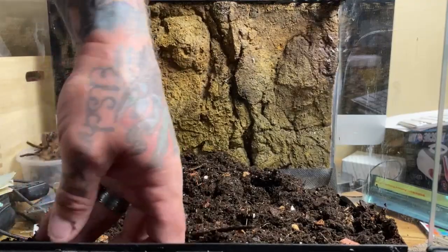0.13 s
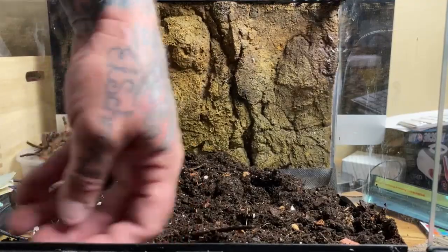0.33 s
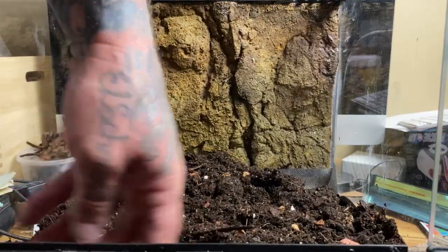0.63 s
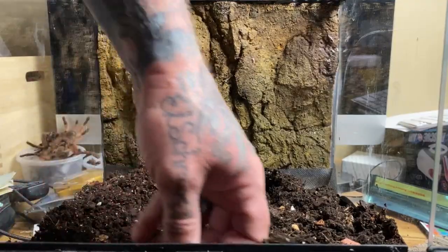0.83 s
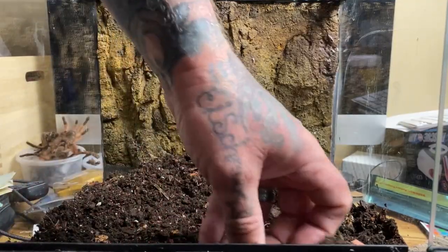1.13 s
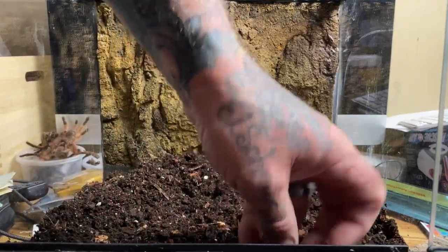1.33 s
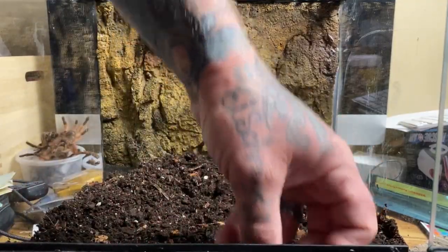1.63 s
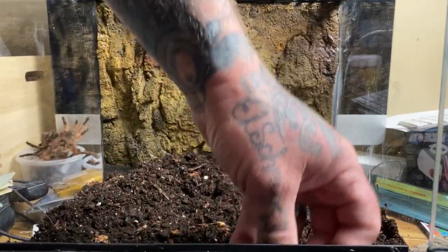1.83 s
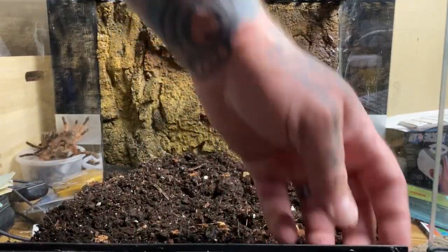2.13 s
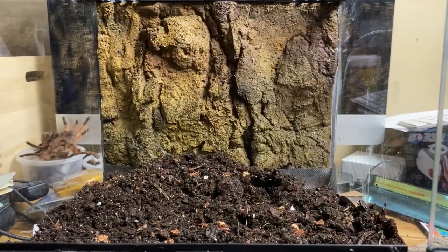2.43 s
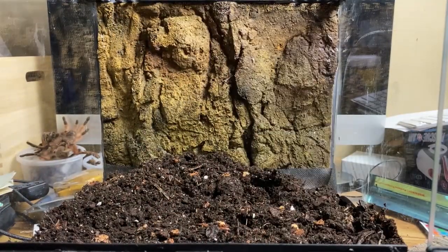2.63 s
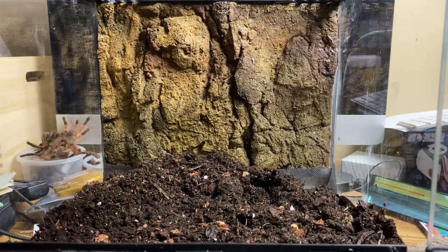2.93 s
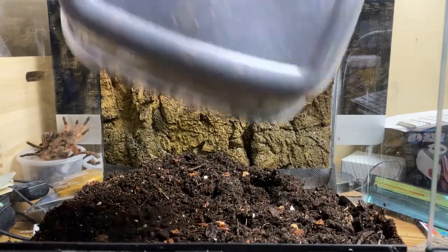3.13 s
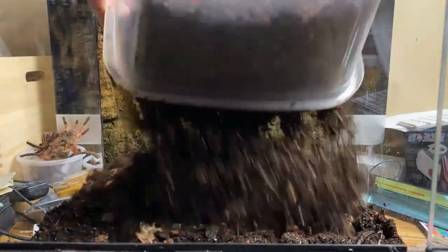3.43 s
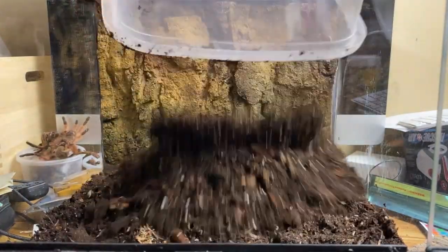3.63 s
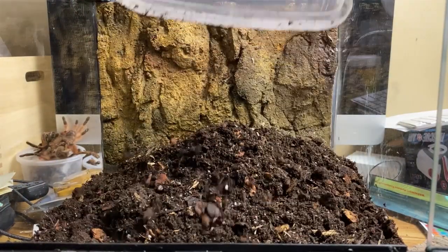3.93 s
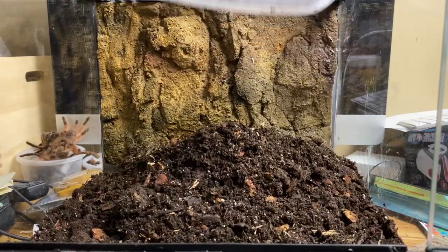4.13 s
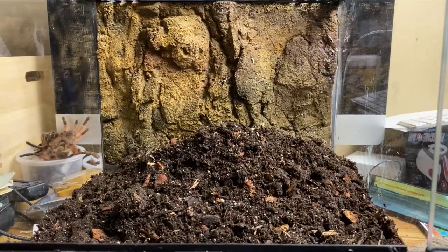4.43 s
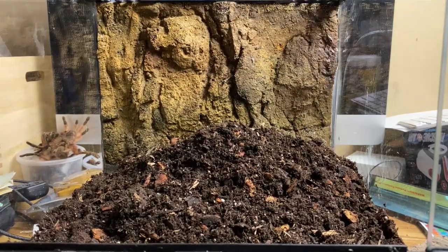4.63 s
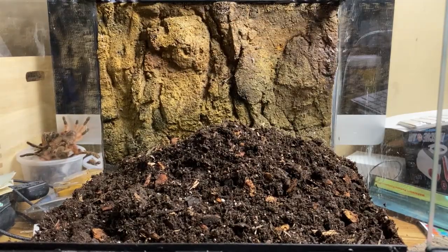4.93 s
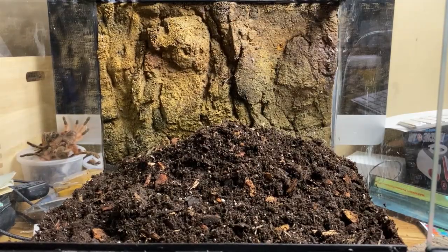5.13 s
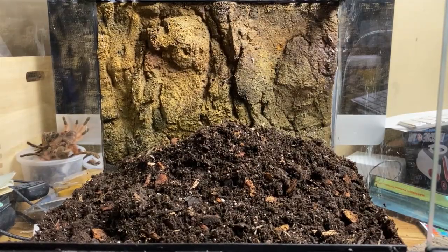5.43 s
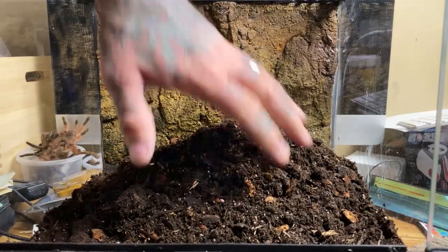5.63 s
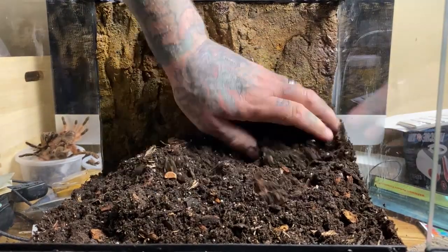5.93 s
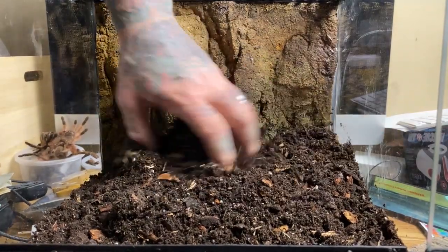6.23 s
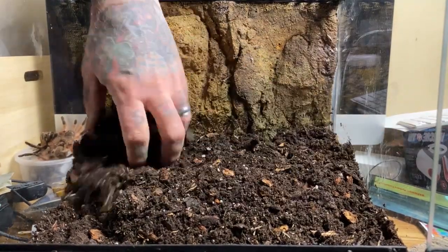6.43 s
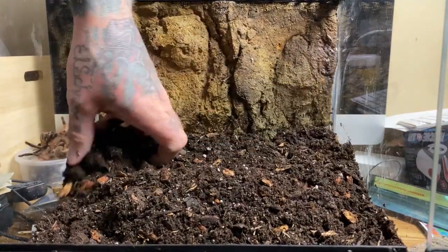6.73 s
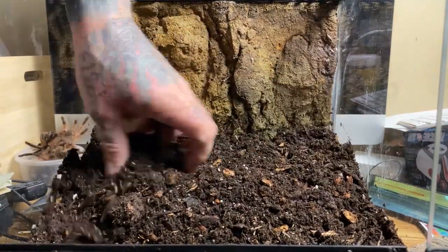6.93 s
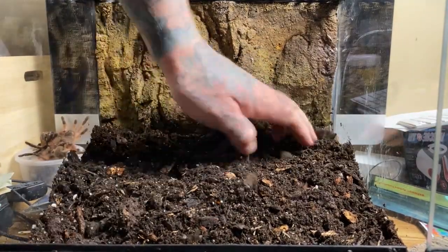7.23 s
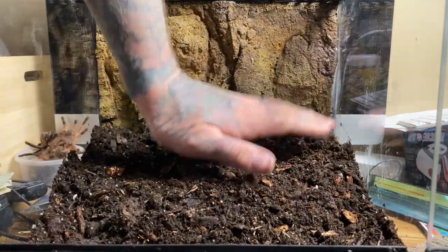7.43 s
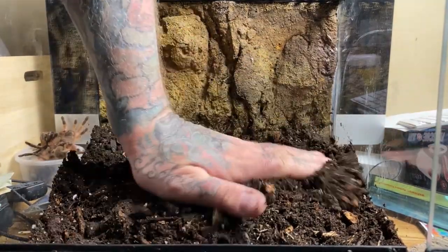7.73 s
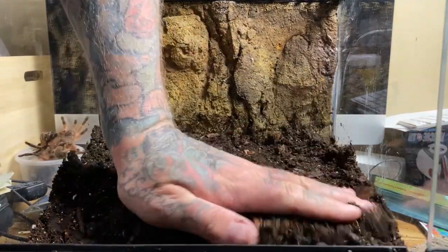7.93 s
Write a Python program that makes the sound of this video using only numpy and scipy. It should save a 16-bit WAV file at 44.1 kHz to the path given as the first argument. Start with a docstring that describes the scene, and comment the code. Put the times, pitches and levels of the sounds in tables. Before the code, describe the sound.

Close stereo pickup in a small furnished room with a faint wavering low hum. Fingers press and spread moist, barky soil in a glass tank with soft crumbles and small crunches. Loose soil shifts in a plastic tub, then pours in a short dense rush with damp thumps. After light sliding bits, the empty tub lands with a loud hollow crack and rattle, and the hand rakes the heap with muffled thuds and rustles.

```python
"""Over a soft, slightly wavering appliance hum, a hand spreads moist soil in a glass tank in a small room:
swells of filtered fracture grains, with crunches, scrapes, snaps and thuds.
Loose soil then slides in a plastic tub and pours out, denser grains with clods as damped bumps.
The empty tub lands hard nearby, a noise crack and decaying modes; it rocks and settles.
The hand then rakes the heap flat, again as grain swells, crunches, snaps and thuds."""
import sys
import numpy as np
from scipy import signal
from scipy.fft import rfft, irfft, next_fast_len
from scipy.io import wavfile

SR = 44100
rng = np.random.default_rng(int(sys.argv[2]) if len(sys.argv) > 2 else 0)


def wrap_up_sound(samples):
    """Save the sound to the file named by the first command line argument, as 16-bit audio."""
    columns = np.atleast_2d(samples).T
    # keep every value between -1 and 1, then stretch to whole-number steps
    tamed = np.clip(columns, -1, 1)
    steps = np.round(tamed * 32767).astype(np.int16)
    wavfile.write(sys.argv[1], SR, steps)


N = 356769
TIME = np.arange(N) / SR
# the pour: [t/s, crumb flow level/dB, landing damp mass level/dB]
POUR = [(3.12, -51.5, -61.5), (3.222, -50.5, -45), (3.354, -38.5, -43.5), (3.386, -38, -34.5),
        (3.44, -46, -44), (3.474, -41, -36.5), (3.519, -44, -42), (3.599, -57.5, -69)]
# stereo spread of the soil: [f/Hz, side over mid/dB]
SOIL_SPREAD = [(120, -18), (350, -12), (1000, -5), (2500, -6.5), (8000, 0.5)]
# stereo balance of the soil: [f/Hz, left over right/dB]
SOIL_BALANCE = [(200, 0), (700, -2), (2400, -1.5), (4400, -3.5), (10000, 0.6)]
SOIL_LAG_S, TUB_LAG_S = 4e-5, 5e-4  # delay of the left port


def undb(db):
    """Decibels to gain."""
    return np.exp(np.asarray(db) * (np.log(10) / 20))


def unit(x):
    """Scale to rms 1."""
    return x / np.sqrt(np.mean(x ** 2))


def colour(x, points):
    """Filter by a gain curve of [f/Hz, gain/dB], straight over log frequency."""
    hz, db = np.transpose(points)
    size = next_fast_len(x.shape[-1], real=True)
    f = np.maximum(np.fft.rfftfreq(size, 1 / SR), 1)
    gain = undb(np.interp(np.log(f), np.log(hz), db))
    return irfft(rfft(x, size) * gain, size)[..., :x.shape[-1]]


def band(x, hz, octaves):
    """Filter by a bell over log frequency, falling a little towards the treble; rms 1."""
    size = next_fast_len(len(x))
    f = np.maximum(np.fft.rfftfreq(size, 1 / SR), 1)
    bell = np.exp(-.5 * (np.log2(f / hz) / octaves) ** 2) / np.sqrt(1 + f / hz)
    return unit(irfft(rfft(x, size) * bell, size)[:len(x)])


def fade(t, t60):
    """Exponential decay, 60 dB in t60."""
    return np.exp(-np.log(1000) * t / t60)


def flare(t, peak_s, rise_s, fall_s):
    """Exponential rise to 1 at the peak, then exponential fall."""
    return np.exp(-np.maximum((peak_s - t) / rise_s, (t - peak_s) / fall_s))


def press(length_s, attack_s, release_s):
    """Motion builds up, holds and dies away."""
    age = TIME[:int((length_s + 10 * release_s) * SR)]
    return np.clip(age / attack_s, 0, 1) * np.exp(-np.maximum(age - length_s, 0) / release_s)


def add(out, s, sound):
    """Mix a sound in at time s."""
    i = int(s * SR)
    out[..., i:i + sound.shape[-1]] += sound[..., :N - i]


def wander(count, per_s):
    """Random values joined by straight lines, spread near 1."""
    place = np.arange(count) * per_s / SR
    return np.interp(place, np.arange(1024), 1.2 * rng.standard_normal(1024))


def jerks(count):
    """Random gain of small uneven movements."""
    spread_db, per_s = 2.5, 70
    return undb(spread_db * wander(count, per_s))


def grains(count, per_s, spread_db):
    """Tiny fractures at random moments: many weak, a few strong; rms 1."""
    when, strength, sign = rng.random((int(per_s * count / SR), 3)).T
    size = undb(spread_db * np.minimum(-np.log(1 - strength), 4))
    return unit(np.bincount((when * count).astype(int), size * np.sign(sign - .5), count))


def tint(x):
    """Random gains drift over bands and moments, so the noise colour keeps shifting."""
    depth_db, per_s, per_octave = 2.8, 22, 3.5

    def bumps(place):
        return np.exp(-2 * (place[:, None] - np.arange(place[-1] + 1)) ** 2)

    f, t, frames = signal.stft(x, SR, nperseg=512)
    bands = bumps(np.log2(1 + f / 200) * per_octave)
    moments = bumps(t * per_s)
    draws = rng.standard_normal((bands.shape[1], moments.shape[1]))
    db = depth_db * bands @ draws @ moments.T
    return unit(signal.istft(frames * undb(db), SR)[1][:len(x)])


def bump(hz, swell_s, rough=0.42, linger=6.2):
    """A soft push swells a heavily damped resonance; loose soil settles around it."""
    t = TIME[:SR // 4]
    age = t / swell_s
    ring = age * np.exp(1 - age) * np.sin(2 * np.pi * hz * t)
    noise = band(rng.standard_normal(len(t)), hz, octaves=0.88)
    settle = (1 - np.exp(-2 * age)) * np.exp(-age / linger) * noise
    return ring + rough * settle


def ports(a, b, lag_s, spread, balance):
    """Two microphone ports share the bass but hear different scattered treble; the left lags."""
    mid, side = (a + b) / np.sqrt(2), colour(a - b, spread) / np.sqrt(2)
    left = colour(mid + side, [(hz, db / 2) for hz, db in balance])
    right = colour(mid - side, [(hz, -db / 2) for hz, db in balance])
    return np.array([np.pad(left, (round(lag_s * SR), 0))[:len(a)], right])


def hum(level_db, waver_db=2.5):
    """Appliance hum of a few sines with a slow level curve and small random waver."""
    # [f/Hz, rms level before level curve and waver/dB]
    partials = [(119, -62.5), (178, -73), (240, -82)]
    tone = np.zeros(N)
    for hz, db in partials:
        tone += undb(db) * np.sqrt(2) * np.sin(2 * np.pi * (hz * TIME + rng.random()))
    return tone * undb(waver_db * wander(N, 10)) * undb(level_db)


def still_air(level_db, air_db=-62):
    """Room air is filtered noise, its bass alike at both ports; it follows part of the level curve."""
    # [f/Hz, density/(dB per Hz)]
    air_spectrum = [(20, -7.5), (50, -0.5), (110, -4.5), (170, -7.5), (260, -19), (500, -23), (1000, -21.5),
                    (2500, -28.5), (6000, -49.5), (16000, -56.5)]
    level_share = 0.27
    mid, side = unit(colour(rng.standard_normal((2, N)), air_spectrum))
    side = colour(side, [(100, -8.5), (300, -1), (900, 1.0)])
    return undb(air_db + level_db * level_share) * np.array([mid + side, mid - side])


def background():
    """Appliance hum over room air, both on one slow level curve."""
    # [t/s, background level/dB]
    level_points = [(0, -13), (.7, -7), (1.4, -4), (2.5, 2), (3.1, -3.5), (4.1, -5), (4.8, -3), (5.3, -4.5),
                    (5.9, 3.5), (7, 0), (8.1, 2.5)]
    level_db = np.interp(TIME, *np.transpose(level_points))
    return hum(level_db) + still_air(level_db)


def motion():
    """Strength of crumbs, damp mass and fibre hiss: strokes, slides, pour and creep add in power."""
    # disturbed soil keeps creeping: [crumb level/dB, damp mass level/dB, fibre hiss level/dB]
    settling_db = (-81, -76.5, -76.5)
    # hand through the heap: [t/s, length/s, crumb level/dB, damp mass over crumbs/dB, hiss over crumbs/dB]
    strokes = [(0, 0.17, -61, 0, -3), (0.257, 0.061, -66.5, 5, -8), (0.395, .13, -55.5, 1, -9),
               (0.57, 0.17, -62, -0.5, -14), (0.775, 0.099, -57, 1.5, -14), (0.878, 0.11, -60, 4, -6.5),
               (1.077, 0.22, -67, 0.5, -6.5), (1.571, .06, -60.5, 4, -10), (1.634, 0.092, -51, -4.5, -6.5),
               (1.755, 0.27, -66.5, 0, 1), (1.943, 0.14, -58.5, -1.5, -1.5), (2.106, 0.39, -76, 4, 9),
               (5.576, 0.26, -62.5, 2, -1.5), (5.873, 0.14, -54.5, 6, -9.5), (6.1, 0.47, -65, 5.5, -3),
               (6.29, 0.14, -56, 7, -6.5), (6.678, 0.12, -67.5, 6, 1), (7.185, 0.068, -63, 12, -17.5),
               (7.512, 0.099, -50.5, 2.5, -11.5), (7.663, 0.43, -65.5, 5, -5)]
    # loose soil in the tub, lifted, shaken out and carried off: [t/s, length/s, crumb level/dB]
    slides = [(2.337, 0.18, -70), (2.489, 0.041, -56), (2.636, 0.14, -66), (2.799, 0.063, -48),
              (2.923, 0.039, -53), (3.026, 0.029, -56.5), (3.617, 0.066, -58.5), (3.774, 0.079, -66.5),
              (4.124, 0.075, -58), (4.291, 0.054, -60.5), (4.39, 0.23, -69), (4.675, 0.032, -54.5),
              (4.755, 0.069, -59), (4.93, 0.35, -72)]
    slide_mass_db, slide_hiss_db = 0.5, 1  # over the crumbs
    pour_crumb_db, pour_mass_db, pour_hiss_db, pour_edge_s = -0.5, 1, -3, 0.077

    power = undb(settling_db)[:, None] ** 2 * np.ones(N)
    for s, length_s, db, depth_db, hiss_db in strokes:
        levels = undb([db, db + depth_db, db + hiss_db])
        add(power, s, np.outer(levels, press(length_s, attack_s=0.016, release_s=0.043)) ** 2)
    for s, length_s, db in slides:
        levels = undb([db, db + slide_mass_db, db + slide_hiss_db])
        add(power, s, np.outer(levels, press(length_s, attack_s=0.012, release_s=0.048)) ** 2)

    s, *columns = np.transpose(POUR)
    tipping = press(s[-1] - s[0], pour_edge_s, pour_edge_s)
    flow_db, landing_db = (np.interp(s[0] + TIME[:len(tipping)], s, c) for c in columns)
    levels = undb([flow_db + pour_crumb_db, landing_db + pour_mass_db, flow_db + pour_hiss_db])
    add(power, s[0], (tipping * levels) ** 2)
    return np.sqrt(power)


def chips():
    """Bits of bark each ring for a few cycles at their own pitch; flat on average."""
    t = TIME[:SR // 100]
    out = np.zeros(N + len(t))
    when, pitch, strength = rng.random((700 * N // SR, 3)).T  # 700 per second
    hz = 350 * 30 ** pitch
    decay_s = np.minimum(3 / hz, .003)
    size = undb(4 * np.minimum(-np.log(1 - strength), 3.5)) * np.sqrt(hz / decay_s)
    for i, f, tau, a in zip((when * N).astype(int), hz, decay_s, size):
        out[i:i + len(t)] += a * np.exp(-t / tau) * np.sin(2 * np.pi * f * t)
    return unit(out[:N])


def stirring(moving, jerk, bark, damp_db=-1, grit_db=-1, fine_db=-1, heavy_db=-3):
    """Crumbs break, fine fibres hiss and the damp mass shifts, all in the same small jerks."""
    # damp crumbs: [f/Hz, gain/dB]
    damp_curve = [(250, -12), (480, 7), (750, 3.5), (1150, -1.5), (1700, -13), (3500, -33)]
    # gritty crumbs: [f/Hz, gain/dB]
    grit_curve = [(700, -23), (1400, 2), (2400, 5), (3800, -3.5), (6000, -24.5), (12000, -30.5)]
    # fibre hiss: [f/Hz, gain/dB]
    hiss_curve = [(1500, -15), (3200, 10), (5200, 11), (7500, 7.5), (10000, 5.5), (16000, -1.5)]
    # shifting damp mass: [f/Hz, gain/dB]
    mass_curve = [(40, -20), (90, -5.5), (170, -2.5), (270, 1), (400, -3), (600, -14.5), (1200, -42)]
    grit_over_damp_db, crowd_db = 0.5, -38

    crumbling, shifting, hissing = moving
    # dry grit lies on top: its share falls with depth
    gritty = undb(grit_over_damp_db) * crumbling / shifting
    single = tint(grains(N, per_s=1300, spread_db=4.2) + bark)
    dense = grains(N, per_s=3500, spread_db=3.2)
    # above crowd_db the dense tumble outweighs single breaks
    crowd = crumbling / undb(crowd_db)
    breaks = (single + crowd * dense) / np.hypot(1, crowd)

    damp = unit(colour(breaks, damp_curve)) * undb(damp_db)
    grit = unit(colour(breaks, grit_curve)) * undb(grit_db)
    crumbs = (damp + gritty * grit) / np.hypot(1, gritty) * crumbling
    fibres = tint(grains(N, per_s=8000, spread_db=3))
    lumps = grains(N, per_s=1500, spread_db=2.5)
    hiss = unit(colour(fibres, hiss_curve)) * undb(fine_db) * hissing
    mass = unit(colour(lumps, mass_curve)) * undb(heavy_db) * shifting
    return (crumbs + mass) * jerk + hiss * np.sqrt(jerk)


def ticks(octaves=0.99, gain_db=3.5):
    """Bark snaps and crumbs strike plastic or glass: millisecond noise bursts, each from its own place."""
    # [t/s, level before gain_db/dB, centre f/Hz, left over right/dB]
    snaps = [(.148, -45, 1230, -3), (.350, -55, 2230, 4), (.411, -56, 9000, -4), (0.868, -43.5, 12400, 1),
             (.884, -54, 1200, -1), (1.932, -52, 2660, -5), (2.654, -42.5, 3070, 0), (3.051, -33, 3040, -3),
             (3.1054, -29.5, 1760, -1), (3.1662, -27, 6200, 0), (3.178, -36.5, 1460, 0),
             (3.228, -36, 1350, 0), (3.74, -25.5, 2950, -3), (6.356, -45, 1790, 0), (6.484, -46, 1140, -2),
             (6.688, -54, 2280, 1), (7.831, -47, 3400, -1.5), (8.03, -41, 10000, 1)]
    rise_s, decay_s = 0.0003, 0.0026
    out, t = np.zeros((2, N)), TIME[:SR // 8]
    envelope = (1 - np.exp(-t / rise_s)) * np.exp(-t / decay_s)
    for s, db, hz, pan_db in snaps:
        a, b = (envelope * band(noise, hz, octaves) for noise in rng.standard_normal((2, len(t))))
        gain = undb(db + gain_db + np.array([[pan_db], [-pan_db]]) / 2)
        add(out, s, gain * ports(a, b, SOIL_LAG_S, SOIL_SPREAD, SOIL_BALANCE))
    return out


def scrapes():
    """Bark and grit stick and slip, ringing a chip or a patch of wall at its own pitch."""
    # [peak t/s, level/dB, rise/s, fall/s, pitch f/Hz]
    scrape_events = [(0.351, -50, 0.0011, 0.0087, 2380), (.408, -47, 0.0016, .007, 2000),
                     (0.416, -38.5, 0.0043, 0.0041, 2430), (.415, -51, 0.0043, 0.0037, 15200),
                     (.504, -42, 0.01, 0.0071, 2250), (.522, -41, 0.0056, 0.011, 680),
                     (.53, -44, 0.021, 0.0057, 1550), (4.149, -56, 0.011, 0.014, 3030),
                     (4.82, -56, 0.022, 0.019, 1550), (4.832, -51, 0.0096, 0.0084, 520)]
    width = 0.08  # share of the pitch
    out, t = np.zeros(N), TIME[:SR // 2]
    lead = t[len(t) // 4]
    for s, db, rise_s, fall_s, hz in scrape_events:
        slips = grains(len(t), per_s=4000, spread_db=2)
        ring = signal.lfilter(*signal.iirpeak(hz, 1 / width, fs=SR), slips)
        scrape = flare(t, lead, rise_s, fall_s) * band(ring, hz, octaves=0.76)
        add(out, s - lead, undb(db) * scrape)
    return out


def crunches(bark):
    """A handful is crushed or slides: a cloud of fractures swells and dies."""
    # [peak t/s, level/dB, rise/s, fall/s, centre f/Hz, width/octaves]
    handfuls = [(0.415, -40, 0.0054, 0.0051, 3200, 2.4), (0.505, -34, 0.014, 0.018, 1210, 1.33),
                (.58, -46.5, 0.0024, 0.0041, 3450, 0.49), (1.23, -58, 0.017, 0.026, 1300, 1.86),
                (1.652, -44.5, 0.018, 0.043, 2400, 3.1), (1.653, -42.5, .008, 0.0088, 830, 0.28),
                (2.812, -47, 0.004, 0.045, 7000, 0.91), (3.327, -31.5, 0.0017, 0.0059, 6194, 0.48),
                (3.379, -29, 0.005, 0.014, 910, 0.37), (3.403, -31.5, 0.0035, 0.0091, 4960, 0.88),
                (3.622, -33, 0.0079, 0.0092, 1800, 2.8), (3.65, -33.5, 0.0011, 0.0053, 1900, 1.2),
                (3.76, -27.5, 0.0043, 0.0077, 3540, 0.92), (3.966, -43.5, 0.0017, 0.009, 2750, 1.14),
                (4.807, -47, 0.024, 0.012, 5260, 0.34), (5.889, -45, 0.0022, 0.007, 1190, 0.35),
                (5.912, -28.5, 0.0043, 0.0045, 1100, .25), (5.913, -42, 0.0089, 0.046, 2200, 3.3),
                (6.162, -57.5, .008, 0.014, 1680, 1.3), (6.38, -50, 0.014, .035, 1500, 0.8),
                (6.4314, -33.5, 0.0011, 0.0035, 2300, 1.02), (6.954, -56.5, 0.009, 0.018, 3700, 0.65),
                (7.228, -56, 0.011, 0.016, 808, 0.75), (6.745, -62.5, 0.03, 0.029, 9600, 0.22),
                (7.524, -55.5, 0.0034, 0.11, 2300, 0.8), (7.566, -44.5, .008, 0.007, 1700, 1.3),
                (7.606, -46.5, .005, .013, 2200, 1.5), (8.031, -46, 0.0023, 0.014, 3900, 1.2)]
    out, t = np.zeros(N), TIME[:SR // 2]
    lead = t[len(t) // 4]
    for s, db, rise_s, fall_s, hz, octaves in handfuls:
        i = rng.integers(N - len(t))
        breaks = grains(len(t), per_s=8000, spread_db=3) + .7 * bark[i:i + len(t)]
        crunch = flare(t, lead, rise_s, fall_s) * band(breaks, hz, octaves)
        add(out, s - lead, undb(db) * crunch)
    return out


def thuds(gain_db=-4):
    """Low damped thuds of soil, tub and table, each with a higher knock and a rough noise around it."""
    # [t/s, level before gain_db/dB, pitch f/Hz, swell/s, knock over thud/dB, noise over thud/dB]
    low_blows = [(0.502, -34.5, 274, 0.0046, -21, -3.5), (0.978, -42, 279, 0.0044, -7, -4.5),
                 (1.579, -43, 247, 0.0068, -16, -6), (1.653, -33, 242, 0.0094, -13, -9),
                 (2.806, -36, 404, 0.0012, -5, -8), (2.927, -38, 278, 0.0095, -17, -2),
                 (2.96, -34, 276, 0.0028, -2.5, 2), (3.275, -32, 289, 0.0034, -7, -3.5),
                 (3.377, -26, 156.7, 0.0062, -8, -1), (3.462, -26.5, 235.4, 0.0072, -7.5, -10),
                 (3.474, -29.5, 740, 0.00092, -5, 0), (3.548, -34.5, 242, 0.0042, -17, -6),
                 (3.619, -14, 221.4, 0.005, -7.5, -7), (3.65, -17.5, 640, 0.00106, -22, -11.5),
                 (3.744, -33, 426, 0.0021, -18, -5), (3.759, -17.5, 230, 0.0032, -3.5, -4.5),
                 (3.967, -40, 246, 0.0061, -17, -4), (4.695, -35, 101.5, 0.0088, -37, -7.5),
                 (5.432, -30, 54.4, 0.017, -30, -9.5), (5.901, -29.5, 273, 0.0064, -20, -5.5),
                 (5.9073, -10.5, 1020, 0.00061, -32, -13), (6.405, -30, 292, 0.0053, -23, -10),
                 (6.423, -31.5, 333, 0.0036, -20, -22), (6.437, -22.5, 301, 0.0039, -30, -13),
                 (6.484, -44, 260, 0.0061, -21, -6), (7.366, -42.5, 315, 0.0046, -24, -12.5),
                 (8.035, -35, 233.4, 0.011, -20, -7), (8.039, -36, 130.3, 0.01, -26, -11)]
    knock_ratio, knock_shorter = 3.303, 0.63  # pitch and swell over the thud's
    out = np.zeros(N)
    for s, db, hz, swell_s, knock_db, rough_db in low_blows:
        thud = bump(hz, swell_s, undb(rough_db))
        knock = bump(hz * knock_ratio, swell_s * knock_shorter, undb(rough_db))
        add(out, s, undb(db + gain_db) * (thud + undb(knock_db) * knock))
    return out


def rasps():
    """Grit and the tub's rim rasp: a run of tiny slips rings all the wall resonances at once."""
    # [peak t/s, level/dB, rise/s, fall/s, tilt/(dB per octave)]
    rasp_events = [(1.652, -50, 0.022, 0.03, -3), (2.826, -45, 0.011, 0.044, 1),
                   (3.385, -34, 0.0044, 0.025, -2.5), (3.761, -32.5, .003, 0.0071, -7)]
    # wall resonances: [f/Hz, width/Hz, level before tilt/dB]
    wall_modes = [(1906, 123, 3), (2690, 94, 1.5), (3395, 134, 3.5), (4820, 230, -6), (5520, 260, -6.5)]
    out, t = np.zeros(N), TIME[:SR // 2]
    lead = t[len(t) // 4]
    for s, db, rise_s, fall_s, tilt_db in rasp_events:
        slips = grains(len(t), per_s=1100, spread_db=4)
        ring = np.zeros(len(t))
        for hz, width_hz, mode_db in wall_modes:
            mode = signal.lfilter(*signal.iirpeak(hz, hz / width_hz, fs=SR), slips)
            ring += undb(mode_db + tilt_db * np.log2(hz)) * mode
        add(out, s - lead, undb(db) * flare(t, lead, rise_s, fall_s) * np.sqrt(2) * unit(ring))
    return out


def clods():
    """Lumps of every size patter onto the heap as the tub empties, each a damped bump."""
    per_s, over_mass_db, scatter_db = 83, 3, 4
    low_hz, high_hz, swell_cycles = 260, 954, 1  # big to small
    out = np.zeros(N)
    s, _, landing_db = np.transpose(POUR)
    length_s = s[-1] - s[0]
    for when, size, strength in rng.random((int(per_s * length_s), 3)):
        at = s[0] + when * length_s
        hz = high_hz * (low_hz / high_hz) ** size
        db = np.interp(at, s, landing_db) + over_mass_db + scatter_db * (2 * strength - 1)
        add(out, at, undb(db) * bump(hz, swell_cycles / hz))
    return out


def soil(moving, jerk, patter):
    """The soil rustles, crunches, scrapes and rasps, with low thuds and pattering clods."""
    bark = chips()
    return stirring(moving, jerk, bark) + crunches(bark) + scrapes() + rasps() + thuds() + patter


def glass(x):
    """The close glass walls throw the treble back within milliseconds and colour it slightly."""
    # echoes: [f/Hz, gain/dB]
    echo_curve = [(600, -30), (1800, -5), (4000, 0)]
    echo_db, t60_s = -11, .04
    t = TIME[:SR // 10]
    echoes = unit(colour(rng.standard_normal(len(t)), echo_curve) * fade(t, t60_s)) / np.sqrt(len(t))
    return x + undb(echo_db) * signal.fftconvolve(x, echoes[None], axes=-1)[:, :N]


def tub_ring(t):
    """Each contact stirs the modes in new shares; low ones build up late, all waver as the walls flex."""
    # tub and table: [f/Hz, level before scatter/dB, t60/s]
    modes = [(63, -17.5, 0.22), (94, -9, 0.24), (166.6, -1.5, 0.17), (262, -14, 0.16), (373.7, -5.5, 0.13),
             (454, -6, 0.13), (578, -17, 0.23), (633, -15, 0.18), (738, -14.5, 0.17), (922, -16.5, 0.15),
             (1180, -11, 0.09), (1485, 2, 0.06), (1535, -15.5, 0.3), (1600, -11.5, 0.068),
             (2160, -10, 0.13), (2275, -11, 0.08), (3306, -7.5, 0.072), (3450, -13.5, 0.072),
             (5330, -12.5, 0.09)]
    flex_base_hz, flex_share = 9, .004  # waver: fixed part plus share of pitch
    build_cycles, scatter_db = 0.84, 1.5
    ring = np.zeros(len(t))
    for k, (hz, db, t60) in enumerate(modes):
        age = t[t < t60]
        flex_hz = (flex_base_hz + flex_share * hz) * wander(len(age), 120)
        path = rng.uniform(-0.35, .35) * hz / 800  # high modes reach each port at their own phase
        swell = (1 - np.exp(-age * hz / build_cycles)) * fade(age, t60)
        gain = (-1) ** k * undb(db + scatter_db * rng.standard_normal())
        ring[:len(age)] += gain * swell * np.sin(2 * np.pi * np.cumsum(hz + flex_hz) / SR + path)
    return ring


def tub(crack_db=4, crack_t60=0.052, rattle_db=-18, rattle_t60=0.51):
    """The hollow tub lands, rocks and settles; each contact cracks, rings and rattles."""
    # [t/s, level/dB, contact hardness as low-pass f/Hz]
    contacts = [(5.2948, -11.5, 3680), (5.349, -35.5, 1700), (5.383, -16, 150), (5.414, -27.5, 1600),
                (5.457, -34.5, 200), (5.497, -40.5, 151), (5.579, -38, 540)]
    # crack of the rim: [f/Hz, density/(dB per Hz)]
    crack_spectrum = [(60, 0), (300, 8.5), (550, 4.5), (900, 1), (3500, -1), (6000, -0.5), (9000, -3),
                      (12000, -11.5), (16000, -12)]
    rise_s = .002  # the flexible rim takes this long to meet the table
    out, t = np.zeros(N), TIME[:SR // 2]
    for s, db, hard_hz in contacts:
        noise = unit(colour(rng.standard_normal(len(t)), crack_spectrum))
        crack = noise * undb(crack_db) * (1 - np.exp(-t / rise_s)) * fade(t, crack_t60)
        rattle = jerks(len(t)) * tint(noise) * undb(rattle_db) * fade(t, rattle_t60)
        softness = signal.butter(1, min(hard_hz, SR / 3), fs=SR)  # a soft contact dulls the treble
        add(out, s, undb(db) * signal.lfilter(*softness, tub_ring(t) + crack + rattle))
    return out


def room(x, wet_db=-13, t60=0.2):
    """The soft tail of a small furnished room, different at the two ports."""
    t = TIME[:SR // 2]
    curve = [(60, -17.0), (300, -3.5), (1000, -1.5), (6000, -7.0), (16000, -5.0)]
    tail = colour(rng.standard_normal((2, len(t))), curve) * fade(t, t60)
    return x + undb(wet_db) * signal.fftconvolve(x, unit(tail) / np.sqrt(len(t)), axes=-1)[:, :N]


def scene(soil_db=-1.0):
    """The soil lies just right of centre; the tub lands further off to the side."""
    # stereo spread of the tub: [f/Hz, side over mid/dB]
    tub_spread = [(110, -19.5), (220, -19), (400, -1.5), (1000, -3), (8000, 3)]
    # stereo balance of the tub: [f/Hz, left over right/dB]
    tub_balance = [(110, 0), (380, 2.5), (1300, -1.5), (4400, -3.5), (12000, -1.5)]
    moving, patter, jerk = motion(), clods(), jerks(N)
    a, b = soil(moving, jerk, patter), soil(moving, jerk, patter)
    tank = glass(ports(a, b, SOIL_LAG_S, SOIL_SPREAD, SOIL_BALANCE) + ticks())
    landing = ports(tub(), tub(), TUB_LAG_S, tub_spread, tub_balance)
    return room(undb(soil_db) * tank + landing) + background()


def record(dry):
    """A fixed tone curve dips near 8.8 and 13.6 kHz, the loudest peaks are rounded and the top is cut."""
    # overall tone: [f/Hz, gain/dB]
    tone_curve = [(20, -21), (32, -7.5), (50, 2.5), (7500, -4.5), (8800, -13), (10500, -2.5), (12300, -4.5),
                  (13600, -24.5), (14700, 5), (15600, -3)]
    top_hz = 16100
    rounded = np.tanh(colour(dry, tone_curve) * np.sqrt(2)) / np.sqrt(2)
    return signal.sosfilt(signal.ellip(10, .2, 80, top_hz, fs=SR, output="sos"), rounded)


dry = scene()
out = record(dry)
wrap_up_sound(out)
```